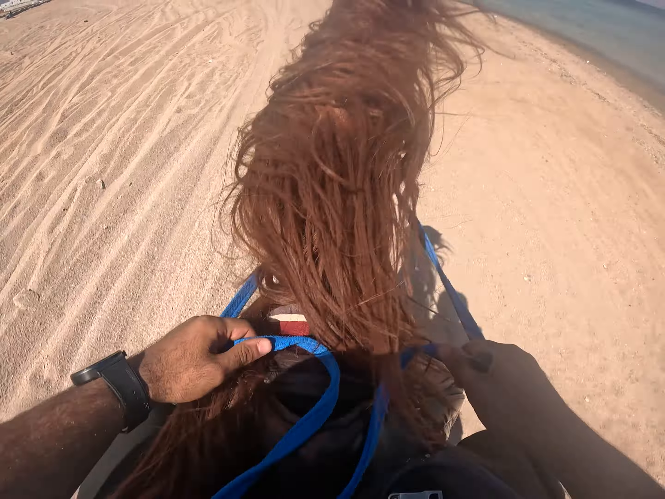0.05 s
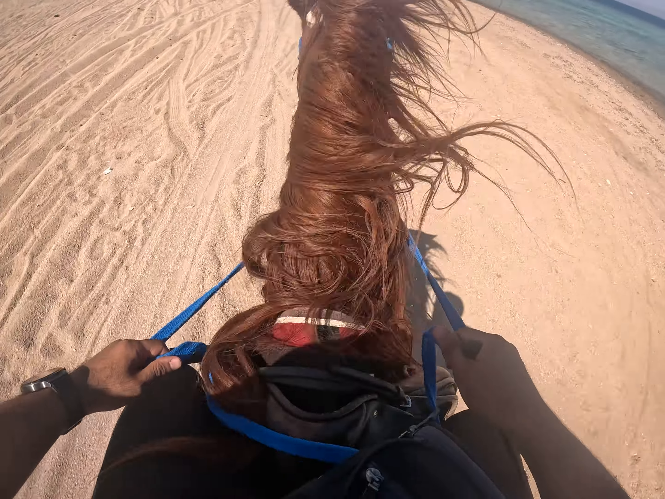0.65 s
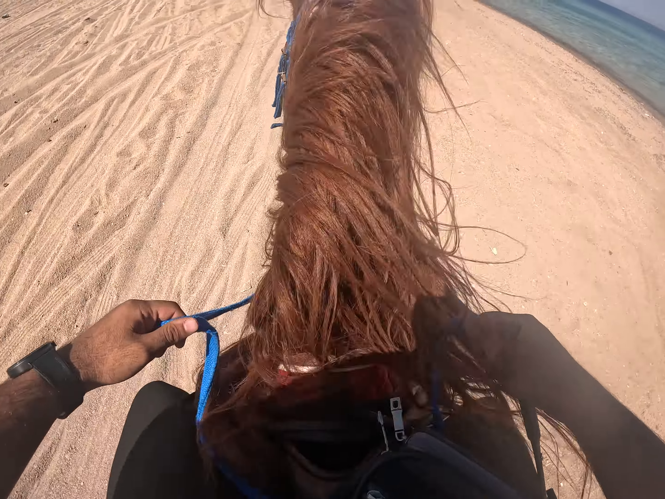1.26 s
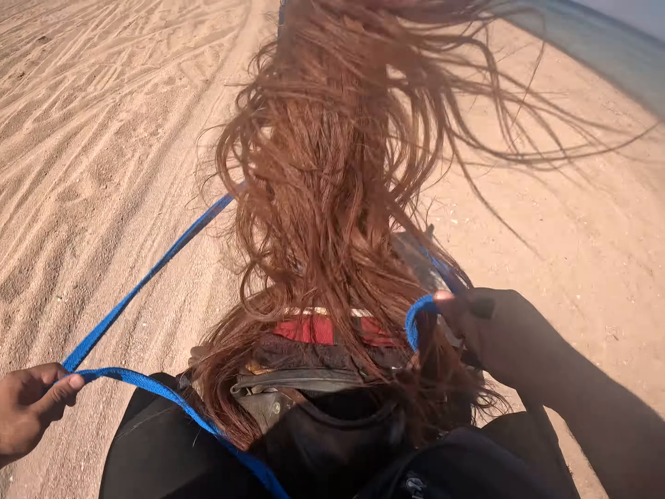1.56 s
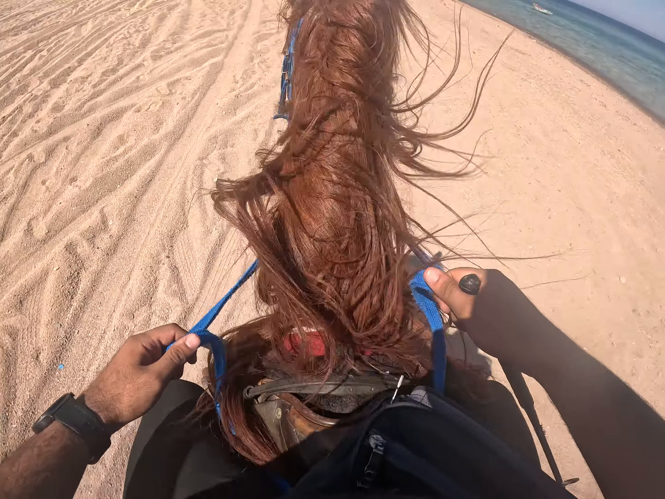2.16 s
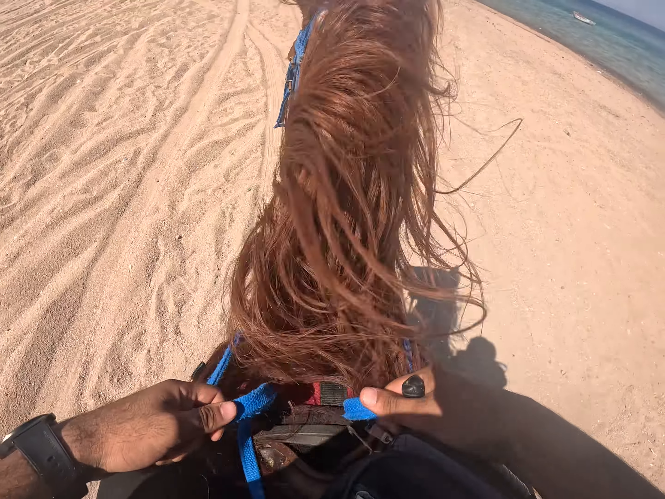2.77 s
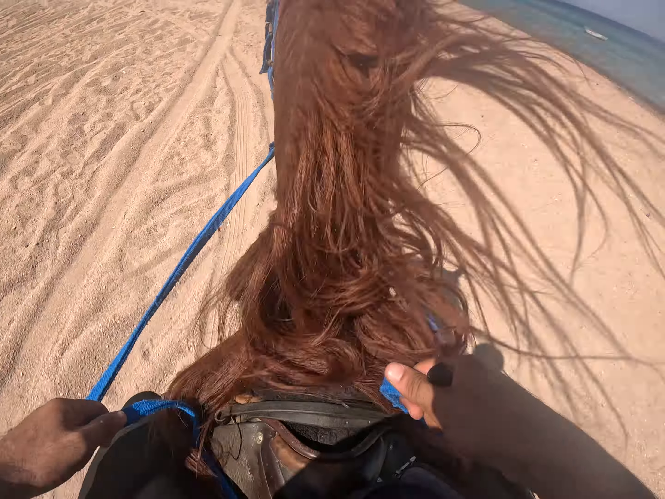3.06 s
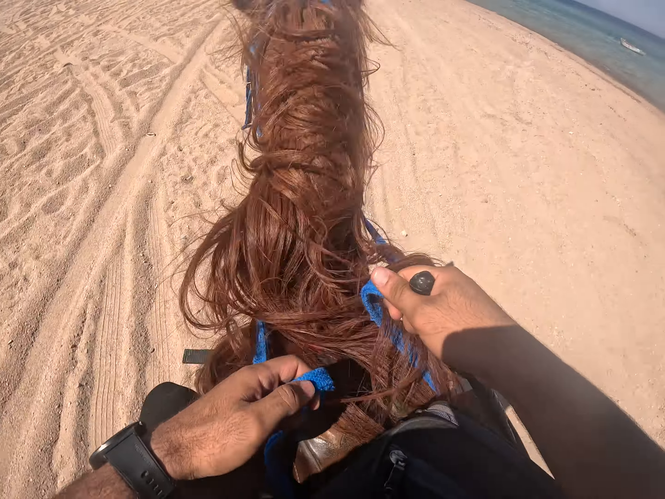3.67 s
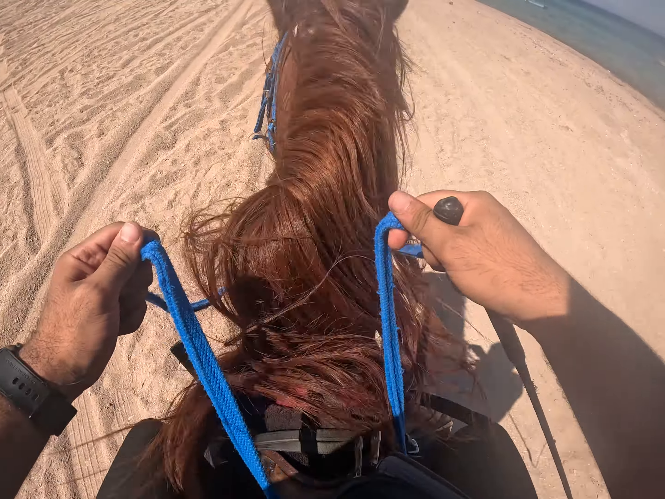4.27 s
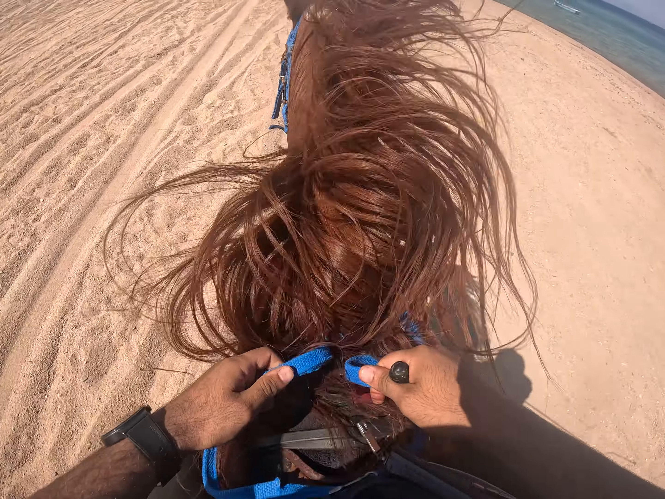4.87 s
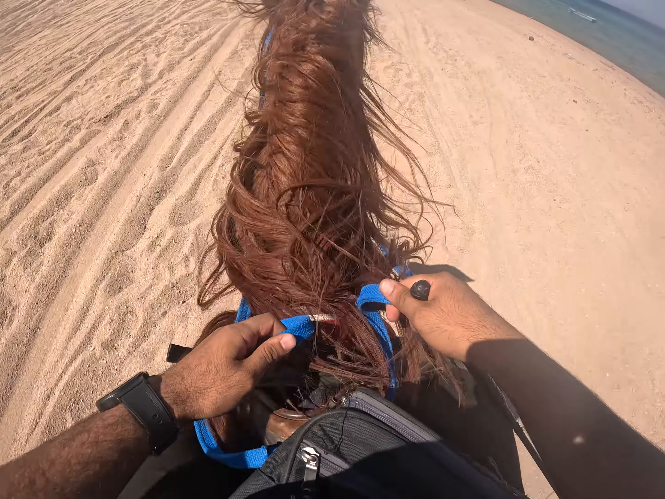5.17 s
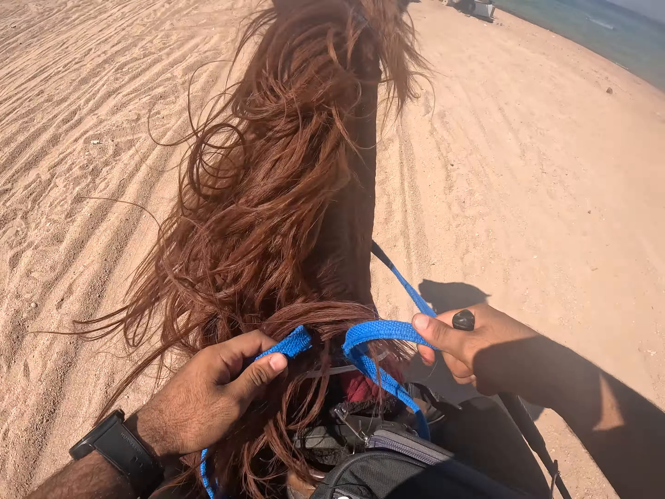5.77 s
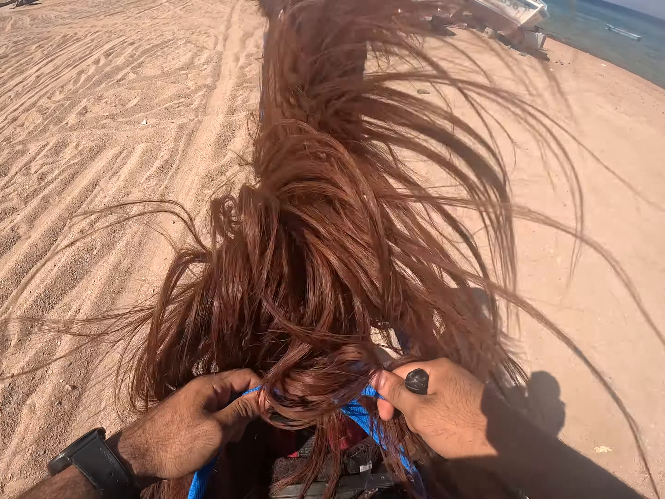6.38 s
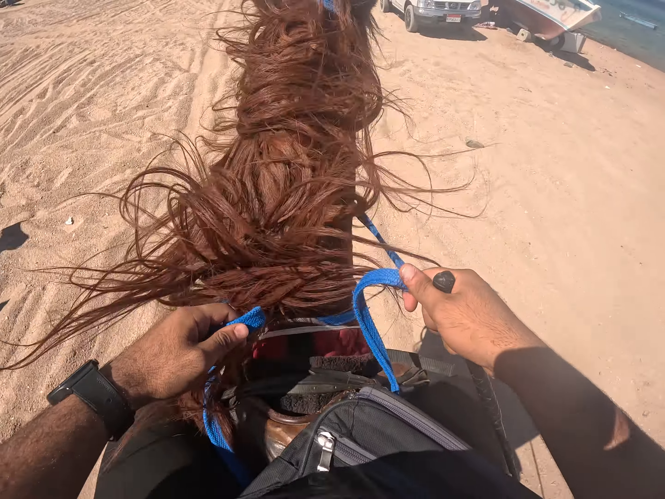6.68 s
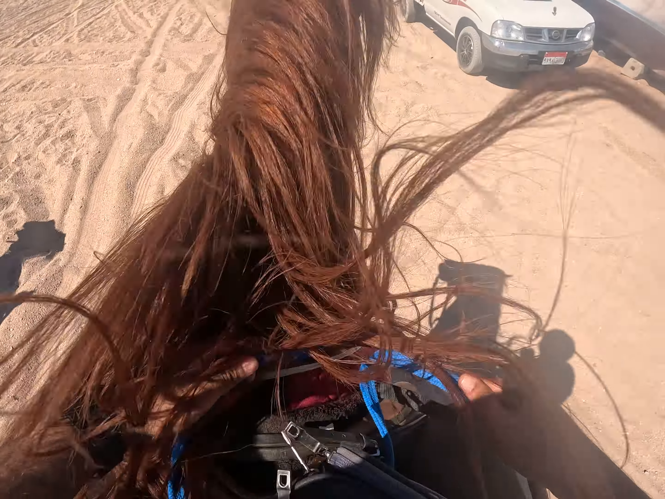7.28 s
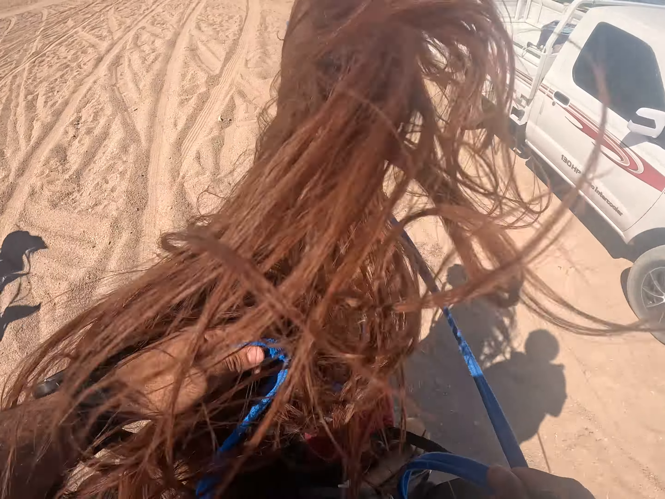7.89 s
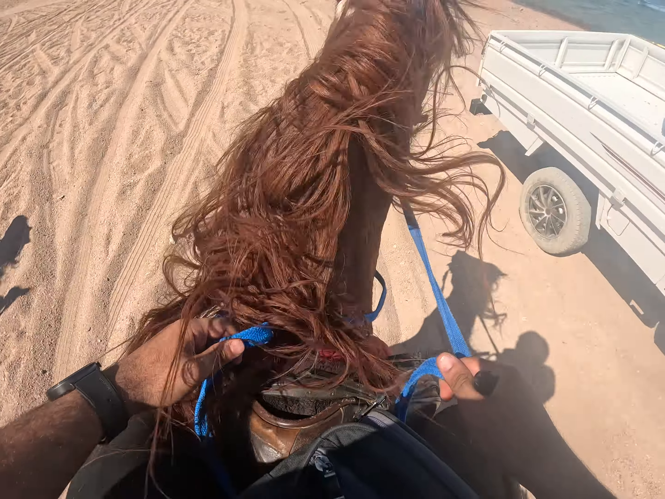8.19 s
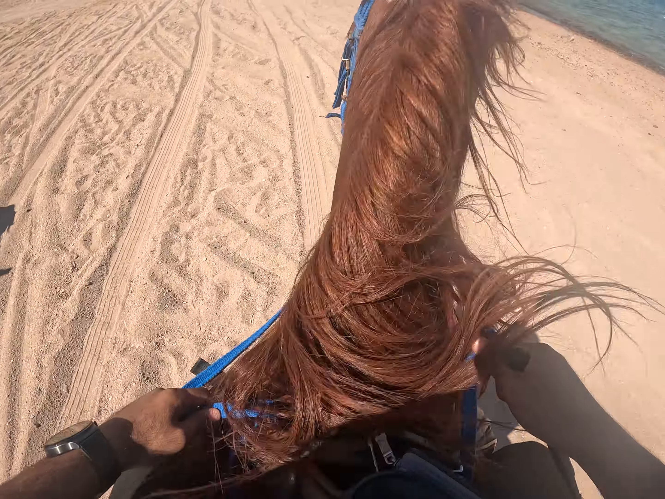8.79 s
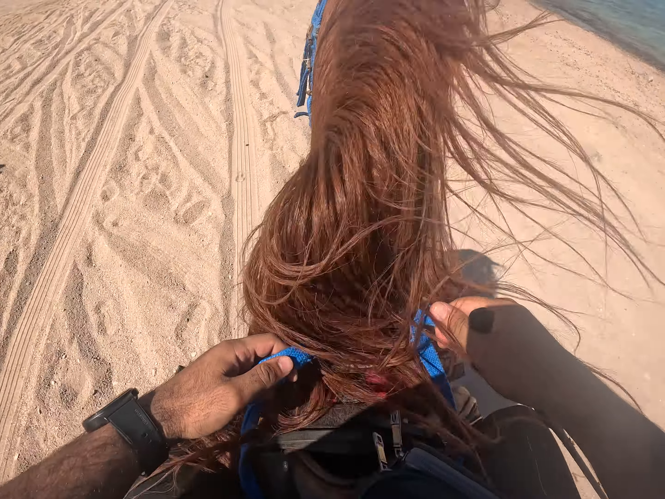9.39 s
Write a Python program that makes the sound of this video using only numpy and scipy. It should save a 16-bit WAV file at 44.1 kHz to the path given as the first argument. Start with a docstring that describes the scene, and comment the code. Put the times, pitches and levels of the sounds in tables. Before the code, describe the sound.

A horse gallops over beach sand for about nine and a half seconds, heard close from a microphone strapped to the rider. The rhythm is steady from the start, about two strides a second. Each stride has a short strap scuff, a low buffet of wind on the microphone, a small saddle crunch and one dull, hard hoof thud. A softer rush of air continues underneath, with a very faint hiss of kicked sand. Knocks of tack, hollow leather taps and buckle snaps are sparse at first and grow busier from around 3 seconds. The hardest jolt lands at about 4.4 seconds. Straps jerk tight with short rasps near 4.2 and 5.9 seconds. The mane swishes by several times between 5.6 and 8 seconds, and a heavier step falls just after 8. Faint bridle chinks come and go. The gallop continues to the end, the rattling easing slightly.

```python
"""A gallop over beach sand

A camera strapped to the rider hears about two strides a second. Each stride scuffs the straps, heaves
air against the microphone, crunches the saddle and ends in one hard hoof jolt. The tack (saddle, straps
and buckles) rattles more as the horse works harder. Wind rushes, sand sprays, the bridle chinks and
the mane brushes by. The camera turns itself down briefly after each loud knock."""
import sys
import numpy as np
from scipy import signal
from scipy.fft import rfft, irfft, next_fast_len
from scipy.io import wavfile
from scipy.ndimage import uniform_filter1d, map_coordinates

SR = 44100
rng = np.random.default_rng(int(sys.argv[2]) if len(sys.argv) > 2 else 0)


def digitize_waveform(pressure):
    """Quantize a signal to 16-bit integers and store it at the path in sys.argv[1].

    Rows of a 2-D input are taken as channels; values are limited to [-1, 1].
    """
    field = np.atleast_2d(pressure).T
    bounded = np.clip(field, -1, 1)
    quanta = np.round(bounded * 32767).astype(np.int16)
    wavfile.write(sys.argv[1], SR, quanta)


N = 416304
TIME = np.arange(N) / SR

# the bottom of the rider's bounce in each stride: t/s
STRIDES = [0.207, 0.687, 1.212, 1.724, 2.207, 2.741, 3.226, 3.759, 4.251, 4.739, 5.195, 5.705, 6.237, 6.707,
           7.241, 7.758, 8.266, 8.785, 9.331]
# hard hoof landings that jolt saddle and camera: t/s, relative level/dB, brightness/(dB per octave)
JOLTS = [(0.27, -11.5, -2), (0.767, -16.5, -3), (1.283, -12.5, -0.3), (1.793, -13.5, -0.5),
         (2.285, -13.5, -0.7), (2.802, -14.5, -1.5), (3.285, -16, -1.5), (3.835, -12.5, -0.9),
         (4.356, -7, -1.2), (4.839, -12.5, 1.5), (5.316, -14.5, -1), (5.793, -19.5, 1.3), (6.339, -9.5, 0),
         (6.883, -12.5, -1.5), (7.312, -13, 1.4), (7.827, -12, 1), (8.333, -15.5, -0.3),
         (8.862, -14.5, 0.2), (9.402, -13, -2.6)]
# tone of small rattling parts: f/Hz, level/dB
RATTLE_TONE = [(60, -26.5), (250, -3.5), (420, -2.5), (750, 0.5), (1700, -3.5), (2400, -3.5), (3400, -21),
               (5000, -35.5), (10000, -44.5), (15000, -96.5)]


def amp(db):
    return 10 ** (np.asarray(db) / 20)


def unit(x):
    """Scale x to an average (rms) level of 1."""
    return x / np.sqrt(np.mean(x ** 2) + 1e-20)


def steady(x, size=700):
    """Even out the loudness of x but keep its fine grain."""
    return x / np.sqrt(abs(uniform_filter1d(x * x, size)) + 1e-12)


def along(points, hz):
    """Read a curve of (frequency, value) points on a log frequency axis."""
    f, v = np.transpose(points)
    return np.interp(np.log(hz + 1), np.log(f + 1), v)


def wobble(rate):
    """A smooth curve through `rate` random values a second."""
    return map_coordinates(rng.standard_normal(int(N * rate / SR) + 4), [TIME * rate])


def filtered(x, response):
    """Scale each frequency in x by response(hz)."""
    size = next_fast_len(N + SR // 2)
    return irfft(rfft(x, size) * response(np.fft.rfftfreq(size, 1 / SR)), size)[:N]


def causal(gain):
    """Turn a gain curve into a filter that rings only after it is struck."""
    cepstrum = irfft(np.log(np.maximum(gain, 1e-6)))
    half = len(cepstrum) // 2
    return np.exp(rfft(np.r_[cepstrum[0], 2 * cepstrum[1:half], np.zeros(half)]))


def add(track, s, sound):
    """Mix a sound in at s seconds."""
    room = track[max(round(s * SR), 0):][:len(sound)]
    room += sound[:len(room)]


def swells(rows):
    """A bell-shaped rise and fall for each row of t/s, half-width/s, level/dB."""
    out = np.zeros(N)
    for s, width, db in rows:
        near = slice(*np.searchsorted(TIME, [s - 3 * width, s + 3 * width]))
        out[near] += amp(db) * np.exp(-2 * ((TIME[near] - s) / width) ** 2)
    return out


def effort(s):
    """How hard the horse works at s seconds, in dB."""
    # the horse's effort: t/s, level/dB
    work = [(0, -14), (3, -3.5), (4, -2.5), (7.8, -1.5), (9.4, -7.5)]
    return np.interp(s, *np.transpose(work))


def housed(tone, hz):
    """The gain of a tone heard through the camera's housing, which boosts some pitches."""
    # resonances of the housing and microphone opening: f/Hz, width/Hz, boost/dB
    resonances = [(420, 90, 2), (800, 200, 5), (1148, 85, 6), (1295, 100, 4.5), (1880, 400, 4),
                  (2750, 300, 8), (3620, 220, 7), (4020, 250, 6), (5250, 200, 6), (6300, 400, 5),
                  (7750, 600, 6)]
    boost_db = sum(db / (1 + (2 * (hz - centre) / width) ** 2) for centre, width, db in resonances)
    return amp(along(tone, hz) + boost_db)


def knock(tone, tilt_db, chatter_s, tail_db, tail_s, size=2048):
    """Two parts chatter together briefly, ringing the struck one and the housing."""
    t, hz = np.arange(size) / SR, np.fft.rfftfreq(size, 1 / SR)
    press = np.exp(-(t / chatter_s) ** 2) + amp(tail_db) * np.exp(-t / tail_s)
    force = rfft(rng.standard_normal(size) * press * (1 - np.exp(-t / 0.00052)))
    force_outline = np.sqrt(uniform_filter1d(np.abs(force) ** 2, size=37))
    octaves = np.log2(np.clip(hz, 330, 3500) / 1400)
    low_hz, high_hz, sharpness, boost_db = 692, 3000, 4.2, 8  # the struck part's own resonance
    ring_hz = low_hz * (high_hz / low_hz) ** rng.random()
    part_db = boost_db / (1 + (2 * sharpness * (hz / ring_hz - 1)) ** 2)
    ring = irfft(force * causal(housed(tone, hz) * amp(tilt_db * octaves + part_db) / force_outline))
    return ring / np.sqrt(np.sum(ring ** 2) / (SR / 100))  # as much energy as 10 ms at level 1


def patter(rate, spread_db, dullest_db, brightest_db, count=12):
    """Small parts, from hollow to sharp, touch at random, `rate` times a second."""
    out = np.zeros(N)
    parts = [knock(RATTLE_TONE, tilt_db, chatter_s=0.0031, tail_db=-18, tail_s=0.0097)
             for tilt_db in np.linspace(dullest_db, brightest_db, count)]
    for moment, strength, part in rng.random((round(rate * N / SR), 3)):
        add(out, moment * N / SR, amp(spread_db * (2 * strength - 0.5)) * parts[int(part * count)])
    return out


def thud(pitch_hz, decay_s, size=4096):
    """A dull, low push that dies away almost at once."""
    t = np.arange(size) / SR
    return -np.sin(2 * np.pi * pitch_hz * t) * t / decay_s * np.exp(1 - t / decay_s)


def head_wind():
    """Air rushes over the microphone opening, swelling with each stride."""
    # the wind between strides: t/s, level/dB
    wind = [(0, -40), (.9, -44), (3.05, -39.5), (3.5, -42.5), (5.5, -44), (9.1, -42.5), (9.4, -41.5)]
    # tone of rushing air: f/Hz, level/dB
    rush_tone = [(60, -19.5), (300, 0), (550, 1.5), (1000, -10), (1600, -7), (2300, -15), (2650, -17.5),
                 (3300, -26), (3900, -23.5), (5000, -36), (8000, -47), (14000, -76)]
    wind_db = np.interp(TIME, *np.transpose(wind)) + 4 * swells([(s - .03, .16, 0) for s in STRIDES])
    air = unit(filtered(rng.standard_normal(N) * amp(wobble(250)), lambda hz: housed(rush_tone, hz)))
    return air * amp(wind_db + wobble(17) + wobble(50))


def air_buffet(swing_hz, width_s, drive, bass_cut_hz, rumble_db, surge_db):
    """Each bounce swings the air pressure enough to overload the microphone; tumbling air rumbles."""
    # strength of the pressure swing: t/s, level/dB
    swing_levels = [(0, -12), (9.4, -15)]
    # tone of tumbling air: f/Hz, level/dB
    rumble_tone = [(5, -6.5), (11, 9), (45, -3), (150, -16), (260, -25.5), (3000, -110)]
    eddy_tone = [(40, -2), (125, 4), (200, 1.5), (3000, -110)]
    pressure = sum(np.sin(2 * np.pi * swing_hz * (TIME - s)) * swells([(s - .022, width_s, 0)])
                   for s in STRIDES)
    overloaded = np.tanh(drive * pressure + 0.48 * wobble(22))
    # the microphone loses the deepest bass, so only the swing's edges get through
    swing = filtered(overloaded, lambda hz: (1j * hz / (bass_cut_hz + 1j * hz)) ** 2)
    rumble = unit(filtered(rng.standard_normal(N), lambda hz: amp(along(rumble_tone, hz))))
    surge = swells([(s - .052, .06, surge_db) for s in STRIDES])  # roughest on the way down
    eddies = unit(filtered(rng.standard_normal(N), lambda hz: amp(along(eddy_tone, hz))))
    tumble = amp(rumble_db + 5 * wobble(7)) * rumble
    tumble += amp(1.1 * wobble(28) + .4 * effort(TIME)) * surge * eddies
    return amp(np.interp(TIME, *np.transpose(swing_levels))) * swing + amp(0.36 * effort(TIME)) * tumble


def sand_spray():
    """Kicked-up sand hisses unevenly, mostly just before each bounce."""
    # extra sprays of sand: t/s, half-width/s, level/dB
    sprays = [(3.02, 0.054, -59), (6.65, 0.021, -45.5), (7.504, 0.11, -58.5)]
    # tone of flying sand: f/Hz, level/dB
    spray_tone = [(1500, -9), (4200, -1.5), (8500, -14), (12000, -29.5)]
    grains = rng.standard_normal(N) * amp(5.5 * wobble(500))
    hiss = unit(filtered(grains, lambda hz: housed(spray_tone, hz)))
    kicks = [(s - 0.06, 0.15, -62) for s in STRIDES]
    return hiss * amp(2 * wobble(35) + 2.5 * wobble(5)) * swells(kicks + sprays)


def rubbing():
    """Straps stick and slip over tiny grains, the saddle crunches under load and the mane hisses by."""
    # straps scuff, mostly on the way down: t/s, half-width/s, relative level/dB
    scuffs = [(0.122, .02, -24), (0.6, 0.029, -29.5), (1.124, 0.033, -24), (1.636, 0.033, -28),
              (2.12, 0.024, -25), (2.645, 0.017, -25), (3.137, 0.02, -22), (3.665, 0.032, -27),
              (4.66, 0.013, -17.5), (5.11, 0.015, -20.5), (5.607, 0.011, -21.5), (6.147, 0.02, -21.5),
              (6.634, 0.018, -20.5), (6.862, 0.024, -31), (7.135, 0.034, -21.5), (7.662, 0.029, -20.5),
              (8.278, 0.017, -22.5), (8.69, 0.022, -22)]
    # a strap jerks tight with a short rasp: t/s, level/dB
    jerks = [(4.207, -16), (5.884, -13.5), (6.183, -20)]
    # mane hair swishes past: t/s, half-width/s, level/dB
    swishes = [(5.607, 0.013, -24), (6.611, 0.0021, -15), (7.03, 0.0092, -29.5), (7.118, 0.038, -26.5),
               (7.625, 0.01, -29.5), (8.076, 0.012, -23.5)]
    # tone of brushing hair: f/Hz, level/dB
    hair_tone = [(500, -17), (1500, 9), (4000, -1.5), (5500, -10), (9000, -14.5), (12000, -30),
                 (15000, -41.5)]
    grit_tone = [(900, -4.5), (3000, -5), (4600, 10), (8000, -4.5), (10000, -2.5)]
    crunch_tone = [(520, -10), (750, 3), (1250, -3.5), (2000, -6.5), (6000, -4)]
    slips = rng.standard_normal(N) * amp(7.8 * wobble(420) + 9.7 * wobble(110))
    grit = steady(filtered(slips, lambda hz: housed(RATTLE_TONE, hz) * amp(along(grit_tone, hz))))
    taps = steady(patter(rate=380, spread_db=4, dullest_db=-5, brightest_db=-2.5))
    strands = rng.standard_normal(N) * amp(7 * wobble(300))
    hair = steady(filtered(strands, lambda hz: housed(hair_tone, hz)))
    crunch = unit(filtered(.5 * grit + taps, lambda hz: amp(along(crunch_tone, hz))))
    # the saddle takes the load just before each jolt
    load = swells([(s - 0.0097, 0.04, db - 9.5 + effort(s)) for s, db, _ in JOLTS])
    scuffing = (amp(-4.5) * grit + amp(-0.5) * taps) * swells(scuffs)
    rasps = grit * swells([(s, 0.018, db) for s, db in jerks])
    return scuffing + crunch * load + rasps + hair * swells(swishes)


def tack_rattle():
    """The mount knocks, buckles snap, leather taps and loose parts clatter around each bounce."""
    # knocks of the tack and camera mount: t/s, level/dB
    knocks = [(0.174, -40), (0.195, -28), (0.332, -25), (1.17, -17), (1.357, -32), (1.54, -22),
              (1.837, -22), (1.944, -28.5), (2.104, -27), (2.211, -18.5), (2.684, -17), (2.821, -16.5),
              (2.921, -30), (3.209, -26.5), (3.398, -24.5), (3.413, -23.5), (3.715, -14), (3.903, -14),
              (4.01, -24.5), (4.025, -28), (4.12, -20.5), (4.148, -19), (4.33, -14), (4.374, -6),
              (4.484, -24), (4.557, -20.5), (4.616, -16.5), (4.683, -17.5), (4.715, -16.5), (4.896, -25),
              (4.977, -25), (5.075, -23.5), (5.122, -17), (5.22, -18), (5.668, -19), (5.843, -16),
              (6.105, -25.5), (6.125, -19), (6.147, -22), (6.273, -23.5), (6.39, -23.5), (6.478, -30.5),
              (6.648, -18), (6.725, -19), (6.846, -18.5), (6.91, -14), (6.936, -16.5), (6.984, -15),
              (7.014, -17.5), (7.175, -17.5), (7.277, -19.5), (7.701, -18.5), (7.813, -10.5), (7.943, -15),
              (8.004, -13.5), (8.153, -20.5), (8.227, -22.5), (8.378, -21), (8.497, -21.5), (8.787, -17),
              (8.909, -17.5), (9.04, -25.5)]
    # tone of a knock: f/Hz, level/dB
    knock_tone = [(150, -9.5), (750, 0), (1700, -2), (3400, -13.5), (5000, -28.5), (7500, -45),
                  (13000, -77)]
    # bright snaps of buckles: t/s, level/dB
    snaps = [(1.725, -19.5), (2.709, -21.5), (3.15, -23.5), (3.275, -25), (3.693, -17), (5.152, -18.5),
             (5.194, -20), (6.185, -17.5), (7.26, -21), (8.722, -24.5)]
    # tone of a buckle: f/Hz, level/dB
    snap_tone = [(300, -3), (1200, 1.5), (2700, 1.5), (5000, -18), (11000, -52)]
    # hollow taps of leather on the saddle: t/s, level/dB
    taps = [(0.223, -31), (0.587, -28.5), (2.333, -25), (2.554, -18), (3.574, -26), (3.794, -19.5),
            (4.173, -21.5), (4.569, -18), (4.79, -27.5), (5.25, -31.5), (5.29, -22), (5.578, -29.5),
            (5.978, -18), (6.304, -18.5), (6.683, -19.5), (7.067, -21.5), (8.138, -25.5), (8.306, -26.5),
            (9.357, -24), (9.389, -19.5)]
    # tone of leather: f/Hz, level/dB
    tap_tone = [(200, -20), (500, 3), (800, 6), (1500, -6.5), (2700, -16), (8000, -58.5)]
    out = np.zeros(N)
    for s, db in knocks:
        tilt_db = rng.normal(-1.5, 2)  # brightness, per octave
        add(out, s, amp(db) * knock(knock_tone, tilt_db, chatter_s=0.0036, tail_db=-7, tail_s=0.0054))
        add(out, s, amp(db - 5.5) * thud(pitch_hz=150 * amp(2 * rng.normal()), decay_s=0.0022))
    for s, db in snaps:
        add(out, s, amp(db) * knock(snap_tone, rng.normal(), chatter_s=.0038, tail_db=-7, tail_s=.0058))
    for s, db in taps:
        add(out, s, amp(db) * knock(tap_tone, rng.normal(), chatter_s=.0041, tail_db=-11, tail_s=.0068))
    shaking = amp(-42) + swells([(s - 0.043, 0.076, -31) for s in STRIDES])  # never quite still
    clatter = patter(rate=40, spread_db=8, dullest_db=-7.5, brightest_db=0.5)
    return out + amp(.5 * effort(TIME)) * shaking * clatter


def hooves():
    """Weight thuds onto the sand, then the leading hoof jolts the mount, which strikes twice."""
    # tone of a hoof jolt: f/Hz, level/dB
    jolt_tone = [(40, -21), (130, -0.5), (370, -0.5), (650, 0.5), (950, -10), (1600, -3), (2300, -10.5),
                 (3500, -12), (5000, -23), (7000, -45), (15500, -63)]
    out = np.zeros(N)
    for s in STRIDES:
        add(out, s - .013, amp(-7.5) * thud(pitch_hz=42 * amp(rng.normal()), decay_s=0.0014))
    add(out, 8.153, amp(-10.5) * thud(pitch_hz=123, decay_s=0.00345))  # one heavier step
    for s, db, tilt_db in JOLTS:
        add(out, s, amp(db + 2) * knock(jolt_tone, tilt_db, chatter_s=0.003, tail_db=1.5, tail_s=0.0027))
        rebound_s = s + 0.0075 * rng.uniform(0.542, 1.7)
        rebound = knock(RATTLE_TONE, tilt_db, chatter_s=0.0034, tail_db=-17, tail_s=0.0036)
        add(out, rebound_s, amp(db - 11) * rebound)
        add(out, s, amp(-17.5) * thud(pitch_hz=100 * amp(rng.normal()), decay_s=0.0027))
    return out


def bridle():
    """Steel rings graze each other in faint chinks that die away fast."""
    # moments when the rings touch: t/s
    chinks = [0.501, 0.701, 0.885, 1.071, 1.434, 1.99, 2.17, 2.363, 2.547, 4.998, 5.168, 5.516, 6.055,
              8.944, 9.267]
    # pitches at which the steel rings: f/Hz, level/dB
    ring_tones = [(3860, 13.5), (4080, 1), (5850, 2), (6400, -15)]
    t = np.arange(2048) / SR
    grazes = rng.standard_normal(N) * amp(4 * wobble(300))
    grazes *= swells([(s + .007, .014, rng.normal(0, 2)) for s in chinks])
    ring = sum(amp(db - 60 * t / .006) * np.sin(2 * np.pi * hz * t) for hz, db in ring_tones)
    shimmer = signal.oaconvolve(grazes, ring / np.linalg.norm(ring))[:N]
    return amp(-43) * filtered(shimmer, lambda hz: 1 / (1 + (hz / 7500) ** 8))


def scene():
    """All the sounds of the ride, in one channel."""
    air = air_buffet(swing_hz=8.3, width_s=.054, drive=9.3, bass_cut_hz=3.36,
                     rumble_db=-25.5, surge_db=-24.5)
    return (hooves() + sand_spray() + tack_rattle() + bridle() + rubbing() + head_wind() + air)[None]


def gain_control(x, threshold_db, slope, release_db_per_s, lag_s, hold_s):
    """Loud sound turns the volume down a moment later; after a short hold it climbs back."""
    level_db = 10 * np.log10(abs(uniform_filter1d(x * x, size=441)) + 1e-12)
    cut_db = slope * np.maximum(level_db - threshold_db, 0)
    cut_db = np.maximum(cut_db, np.interp(TIME - hold_s, TIME, cut_db))
    climb_db = release_db_per_s * TIME
    held_db = np.maximum.accumulate(cut_db + climb_db) - climb_db
    return x * amp(-np.interp(TIME - lag_s, TIME, uniform_filter1d(held_db, size=300)))


def record(dry):
    """The camera turns down loud sound above the bass, rounds off peaks and drops the highest treble."""
    bass = filtered(dry[0], lambda hz: 1 / (1 + (hz / 220) ** 4))
    mix = bass + gain_control(dry[0] - bass, threshold_db=-20.5, slope=1.12,
                              release_db_per_s=93.5, lag_s=0.018, hold_s=0.012)
    rounded = mix / (1 + np.abs(mix) ** 6) ** (1 / 6)
    return filtered(rounded, lambda hz: hz < 16000)[None]


dry = scene()
out = record(dry)
digitize_waveform(out)
```